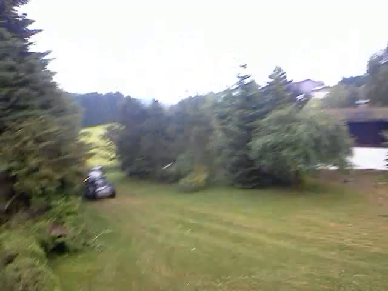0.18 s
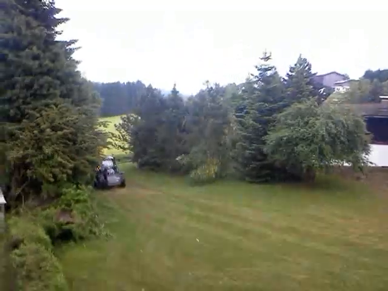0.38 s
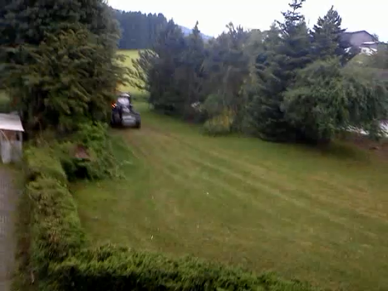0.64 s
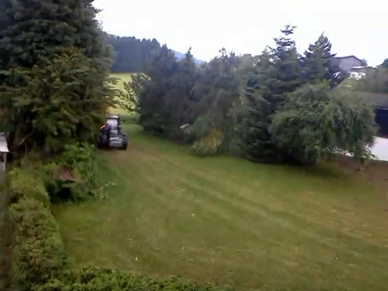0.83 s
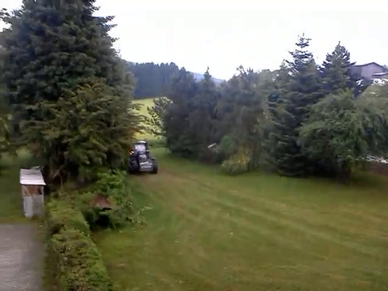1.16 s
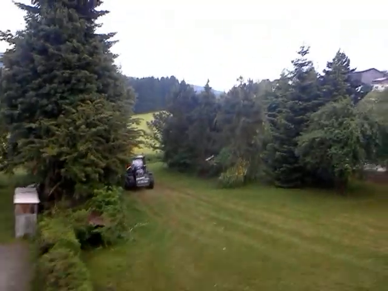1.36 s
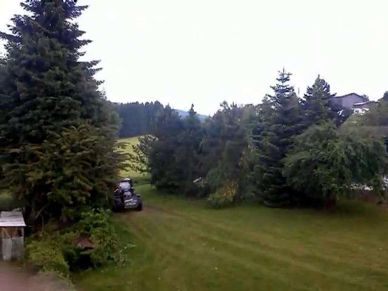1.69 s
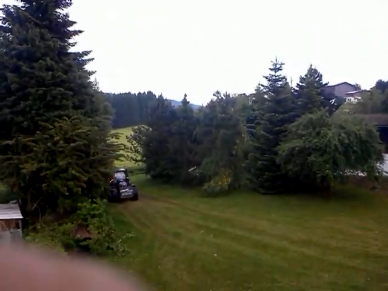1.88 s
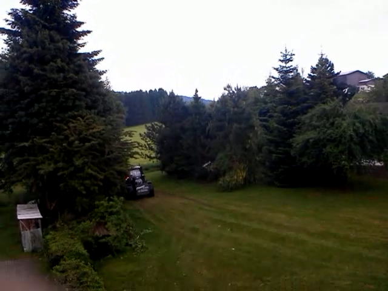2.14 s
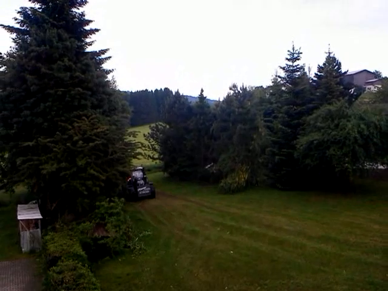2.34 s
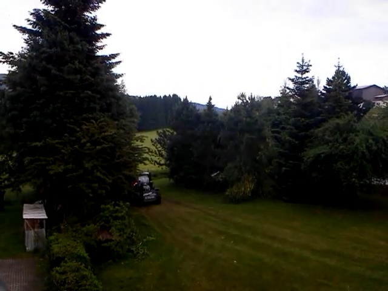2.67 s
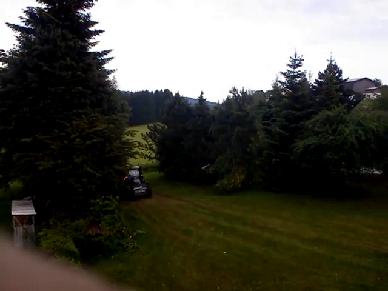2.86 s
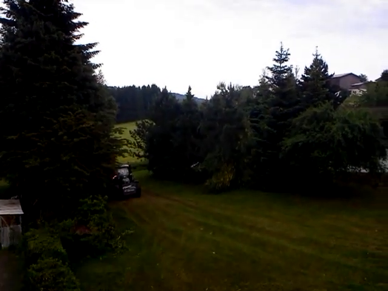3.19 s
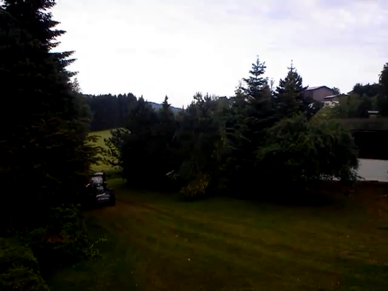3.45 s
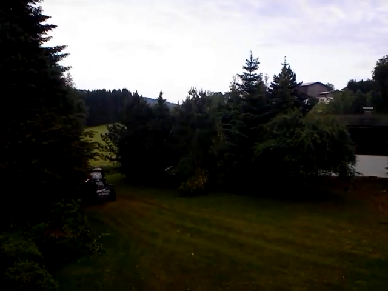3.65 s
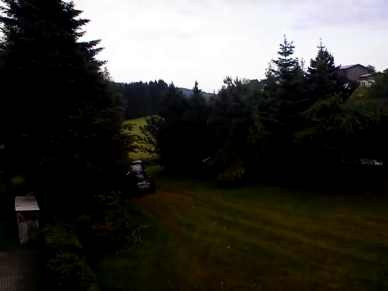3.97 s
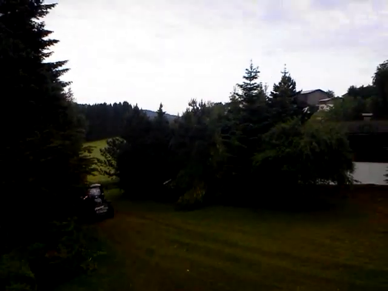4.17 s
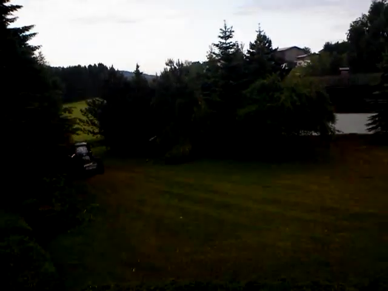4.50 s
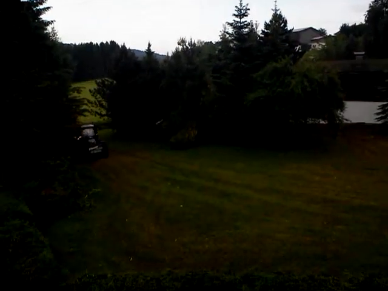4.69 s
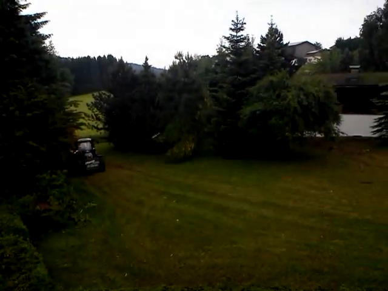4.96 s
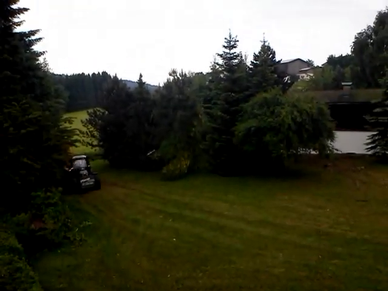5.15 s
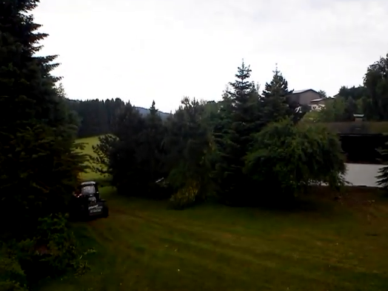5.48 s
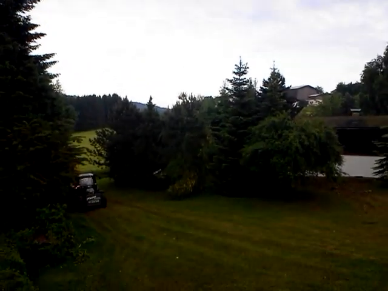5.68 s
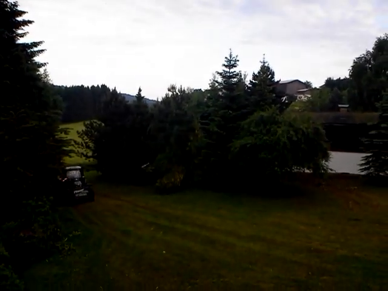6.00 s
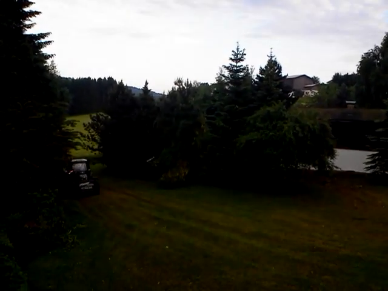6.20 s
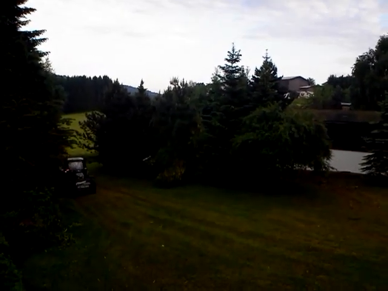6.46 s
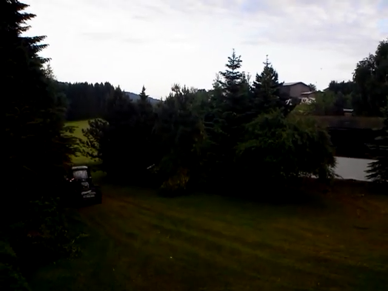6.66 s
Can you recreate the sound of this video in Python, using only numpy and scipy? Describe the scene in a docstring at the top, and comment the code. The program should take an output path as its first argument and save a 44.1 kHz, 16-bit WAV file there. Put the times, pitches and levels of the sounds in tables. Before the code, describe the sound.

A tractor with a flail cutter works a hedge across an open lawn, already running at the start. Its engine roars in the low mids over faint rumble, with a wavering hum around 530 Hz and a softer hydraulic whine near 290 Hz. Flails constantly thrash twigs, with a grainy rattle of chips and flickering hiss. Around 0.4-0.5 s three hard branch cracks strike the steel hood; lighter knocks and snaps follow at 1.4-1.8 s and 2.4-2.5 s, then isolated ones at 3.8, 4.0 and 4.4 s. The engine gradually gets nearer and louder. From 5.5 s the flails bite deepest: cracks, dry snaps and dull thumps crowd together from 5.6 to 6.7 s, while thick wood grinds until about 6.4 s. The drone continues to the end at 6.8 s. Blows have a short outdoor tail; the phone sound is narrow, peaks clipping into ticks.

```python
"""A tractor works along a hedge across a lawn: shaft orders hum, a hydraulic pump whines and the engine roars.
From the start the flails thrash twigs and chips; soon single branches crack against the steel hood.
All the while the engine creeps nearer; late on the flails bite deepest, blows crowd together and thick wood grinds.
Hums are unsteady sines, the rest is coloured noise, ringing bursts and snaps; a narrow-band phone clips the peaks."""
import sys
import numpy as np
from scipy import signal
from scipy.fft import rfft, irfft, next_fast_len
from scipy.io import wavfile
from scipy.ndimage import uniform_filter1d, map_coordinates

SR = 44100
rng = np.random.default_rng(int(sys.argv[2]) if len(sys.argv) > 2 else 0)


def unload_audio(sound):
    """Save the sound as a 16-bit wav file, at the path given as the first command line argument."""
    columns = np.transpose(np.atleast_2d(sound))
    # keep every value between -1 and 1, then stretch to whole-number steps
    steps = np.round(np.clip(columns, -1, 1) * 32767)
    wavfile.write(sys.argv[1], SR, steps.astype(np.int16))


N = 301644

# how deep the flails bite into the hedge: time_s, bite_db
BITE = [(0.0, -39.5), (0.27, -37.5), (0.44, -35.5), (0.59, -29.5), (0.89, -33.5), (2.19, -34), (2.53, -31),
        (2.66, -33), (2.95, -35.5), (3.5, -35), (4.17, -32), (4.84, -34), (5.12, -33), (5.49, -28.5),
        (5.87, -27), (6.25, -28), (6.38, -30.5), (6.69, -31.5), (6.84, -30)]
# colour of the thrashed twigs, shifted in pitch when used: frequency_hz, relative level_db
TWIG_COLOUR = [(300, -45), (700, -3.5), (1000, -3), (1600, -3.5), (1850, -9), (2100, -14), (3000, -51)]
# colour of the thrown chips: frequency_hz, relative level_db
CHIP_COLOUR = [(1200, -41.5), (1900, -10), (2400, -2), (3300, 0.5), (3550, -7.5), (3800, -26.5),
               (4200, -46)]
# colour of the flickering hiss at the top of the narrow band: frequency_hz, relative level_db
TOP_COLOUR = [(3000, -38), (3600, -7), (4000, -11), (4300, -17), (4600, -27.5)]
# branches struck, before distance: start_s, blow_db, knock_hz, crack_hz, crack_over_knock_db, thump_over_knock_db
BRANCHES = [(.435, -11.5, 876, 2290, 2.5, 1), (.482, -11, 1345, 2734, 2.5, -0.5),
            (.516, -5, 1045, 2783, -2.5, -1), (1.359, -11, 982, 3240, -10, -2),
            (1.667, -19.5, 1160, 3050, 3, -5), (1.76, -22.5, 1140, 3260, 7, -6),
            (2.357, -12.5, 1095, 2920, 0, -4), (2.457, -14.5, 1530, 2920, -3, 0),
            (2.519, -13, 1196, 2720, -6, -9), (3.789, -17, 1070, 3220, -1, 0),
            (4.019, -16, 1516, 2800, 4.5, -4), (4.382, -13, 1650, 3240, -11, -1.5),
            (5.62, -13.5, 1745, 2890, -0.5, -18), (5.753, -9, 1374, 3100, -17, -12.5),
            (5.792, -16.5, 1374, 3140, -2.5, -7), (5.856, -16, 1463, 2910, -7, -22.5),
            (5.923, -4.5, 1540, 3126, -2, -0.5), (5.95, -9.5, 1630, 3350, 2, -10),
            (5.981, -9.5, 1030, 3290, -6.5, 1), (6.121, -13.5, 1600, 3450, -6, -7),
            (6.321, -8, 1043, 2840, -3.5, -3), (6.34, -5.5, 1507, 2640, -7.5, 1),
            (6.374, -10.5, 953, 3170, -1, -8), (6.454, -17, 1360, 2360, -21, 0.5),
            (6.595, -14, 1520, 2270, -20, 7.5), (6.62, -14.5, 1400, 2700, -10, 7.5),
            (6.663, -12, 1530, 2810, -9.5, -5), (6.69, -13, 1495, 2610, -2.5, 2.5)]
# how struck wood rings: ratio to its pitch, width as a ratio of the pitch, relative level_db
WOOD_MODES = [(0.799, 0.24, -9), (1, 0.077, 3), (1.203, 0.2, -6), (1.602, 0.39, -14.5)]
# the thump of the steel hood at a blow of -7 dB: frequency_hz, width_hz, relative level_db
HOOD_MODES = [(75, 52, -12.5), (293, 51, 5.5), (496, 94, 1)]
# dry snaps, one short pulse each, before distance: start_s, peak_db, pitch_hz
SNAPS = [(0.524, -2.5, 1200), (1.400, -8.5, 1185), (1.671, -7.5, 2950), (5.7427, -3.5, 1480),
         (5.7928, -9, 2600), (5.841, -9.5, 1363), (5.896, -5.5, 3030), (5.9368, -6, 895), (5.944, -3, 1790),
         (6.019, -6.5, 3460), (6.228, -9, 1690), (6.355, -2.5, 908), (6.586, -10.5, 690)]
# the resonances of grinding thick wood: frequency_hz, width_hz, relative level_db
GRIND_MODES = [(1480, 230, -0.5), (1810, 230, 0)]
# colour of the engine's roar: frequency_hz, relative level_db
ENGINE_COLOUR = [(150, -39), (200, -15), (250, -2), (300, 0.5), (390, -2), (470, 4), (620, -3), (800, -5),
                 (1100, -25), (1800, -33.5), (3000, -56.5)]
# colour of the rumble under it: frequency_hz, relative level_db
RUMBLE_COLOUR = [(15, -41.5), (30, -12), (80, 1), (200, 3.5), (300, -8.5), (600, -48)]
# the shaft: time_s, twelfth_order_hz, twelfth_order_level_db
SHAFT = [(0, 537, -19), (.15, 536, -20.5), (.65, 533, -32), (1.27, 537, -25), (1.6, 536.5, -24.5),
         (1.85, 533.5, -22), (2.5, 525, -25), (2.74, 524.5, -31.5), (3.1, 524.5, -25.5), (3.9, 526.5, -27),
         (4.08, 526, -38), (4.38, 525, -19), (4.7, 525.5, -30), (5.3, 528.5, -23.5), (6.1, 524.5, -33.5),
         (6.4, 523.5, -38), (6.65, 523, -23.5), (6.84, 523, -28.5)]
# two more shaft orders: time_s, thirteenth_order_level_db, seventh_order_level_db
MINOR_ORDERS = [(0, -30.5, -30.5), (.65, -37, -30), (1.27, -29, -35), (1.9, -41, -30), (2.8, -43, -33.5),
                (3.92, -28, -31), (4.2, -36, -39), (4.8, -31.5, -36.5), (5.25, -30.5, -29.5),
                (6.2, -35, -35.5), (6.6, -27, -33.5), (6.84, -35.5, -36)]
# faint orders: multiple of the shaft, level_db
WEAK_ORDERS = [(5, -50), (6, -39), (8, -43.5), (10, -38.5), (24, -44)]
# the hydraulic pump's whine: time_s, pitch_hz, level_db
PUMP = [(0, 293.8, -32.5), (1.1, 293.1, -37), (2.15, 291.8, -29), (2.8, 290.9, -26), (4.6, 290.3, -29),
        (5.2, 292.3, -42.5), (6.2, 289.3, -32), (6.84, 296.4, -28)]
# the whine's octave and the sidebands the shaft puts on it: pump multiple, shaft multiple added, level_db
PUMP_PARTIALS = [(1, -1, -43), (1, 1, -44.5), (1, 2, -42), (2, 0, -43.5)]

BITE_REFERENCE_DB = -30  # the bite at which the flail levels and roar level below hold
TWIG_DB, TWIG_DB_PER_BITE_DB = -24, 0.4
RATTLE_DB, TOP_DB = -30, -42
CENTRE_HZ, CENTRE_HZ_PER_S, CENTRE_HZ_PER_DB = 1182, 30, 5  # the thrash brightens with time and bite
BLOW_T60_S, BLOW_SWELL_S = .11, .005
DEEPENS_DB = 1.1  # harder blows favour the low hood modes: dB per dB of blow and octave under the top mode
GRIND_S, GRIND_RISE_S, GRIND_HOLD_S, GRIND_FALL_S, GRIND_DB = 5.68, .12, .5, .12, -27
ROAR_DB, RUMBLE_DB, NEARING_DB_PER_S = -27, -44, 0.53  # at the start; the tractor creeps closer
ROAR_DB_PER_BITE_DB = 0.13
TAIL_DB, TAIL_T60_S, TAIL_DELAY_S = -7.5, .17, .012
BAND_HZ, CLIP_LEVEL, TOP_HZ = 4700, .705, 15800


def amp(db):
    """Decibels to amplitude."""
    return 10 ** (np.asarray(db) / 20)


def unit(x):
    """Scale to an rms of one."""
    return x / np.sqrt(np.mean(x ** 2) + 1e-20)


def curves(rows):
    """One value per sample for each column after the time."""
    s, *cols = np.transpose(rows)
    return [np.interp(np.arange(N) / SR, s, c) for c in cols]


def wobble(rate):
    """A smooth random curve, rate knots a second."""
    knots = rng.standard_normal(int(N * rate / SR) + 4)
    return map_coordinates(knots, [np.arange(N) * rate / SR])


def filtered(x, response):
    """Shape the spectrum of x by a complex response of frequency."""
    m = next_fast_len(len(x) + 8192)  # padding leaves room for ringing
    return irfft(rfft(x, m) * response(np.fft.rfftfreq(m, 1 / SR)), m)[:len(x)]


def colour(points):
    """The gain through (Hz, dB) points on a log frequency axis."""
    f, db = np.transpose(points)
    return lambda hz: amp(np.interp(np.log(hz + 1), np.log(f), db))


def modes(table):
    """The causal response of a set of resonances, alternating in sign."""
    def response(f):
        return sum((-1) ** k * amp(db) * 1j * f * width / (centre ** 2 - f * f + 1j * f * width)
                   for k, (centre, width, db) in enumerate(table))
    return response


def patchy(patchy_db):
    """White noise with patches of random gain in time and frequency."""
    z = signal.stft(rng.standard_normal(N), nperseg=512)[2]
    field = uniform_filter1d(rng.standard_normal(z.shape), size=5, axis=0)  # smooth over frequency
    field = uniform_filter1d(field, size=8, axis=1)  # smooth over time
    return unit(signal.istft(z * amp(patchy_db * unit(field)), nperseg=512)[1][:N])


def snaps(spread_db):
    """Clicks of very unequal size and random sign, about one sample in sixty."""
    draw = rng.random((3, N))
    struck = draw[0] < 1 / 60
    size = amp(-spread_db * np.log(draw[2] + 1e-3))
    return unit(struck * np.sign(draw[1] - .5) * size)


def tone(turns, db, drift, waver_db):
    """A sine at a phase given in turns, its phase drifting and its rms level wavering about db."""
    phase = turns + rng.random() + drift * wobble(12)
    return np.sqrt(2) * amp(db + waver_db * wobble(16)) * np.sin(2 * np.pi * phase)


def flails(turns, bite_db):
    """Rows of flails pass twice a turn and throw chips; twigs snap in clumps, as patchy noise and clicks."""
    clumps = 0.28 * wobble(9) + wobble(35)
    thrash = patchy(patchy_db=1.7) + 0.29 * snaps(spread_db=4.5)
    dull = unit(filtered(thrash, lambda hz: colour(TWIG_COLOUR)(hz * 1.2)))
    bright = unit(filtered(thrash, lambda hz: colour(TWIG_COLOUR)(hz * .88)))
    centre_hz = CENTRE_HZ + CENTRE_HZ_PER_S * np.arange(N) / SR + CENTRE_HZ_PER_DB * bite_db
    lean = np.clip((centre_hz - 1050) / 420, 0, 1)  # cross-fade from dull to bright
    twigs = unit(dull * (1 - lean) + bright * lean)
    twig_level = amp(TWIG_DB + TWIG_DB_PER_BITE_DB * bite_db + 0.46 * clumps)

    rows = 1 + 0.091 * np.cos(2 * 2 * np.pi * turns)
    chip_noise = patchy(patchy_db=3) + .4 * snaps(spread_db=3.5)
    chips = unit(filtered(rows * chip_noise, colour(CHIP_COLOUR)))
    rattle = amp(RATTLE_DB + 0.35 * clumps + 0.25 * wobble(14)) * chips
    return twig_level * twigs + amp(bite_db) * rattle


def wood(pitch_hz):
    """Struck wood rings in modes at fixed ratios to its pitch."""
    return modes([(pitch_hz * ratio, pitch_hz * width, db) for ratio, width, db in WOOD_MODES])


def hood(blow_db):
    """The steel hood thumps in low modes, and deeper under a harder blow."""
    top_hz = HOOD_MODES[-1][0]
    return modes([(hz, width, db + DEEPENS_DB * (blow_db + 7) * np.log2(top_hz / hz))
                  for hz, width, db in HOOD_MODES])


def dry_snap(pitch_hz, t):
    """A sine pulse with a quick rise, gone in a few cycles, scaled to a peak of one."""
    cycles = pitch_hz * t
    pulse = (1 - np.exp(-cycles / 0.058)) * np.sin(2 * np.pi * cycles)
    pulse = pulse * amp(-60 * cycles / (3 + pitch_hz / 450))
    return pulse / np.abs(pulse).max()


def branches():
    """Each branch splinters as a swelling burst of noise: a thump of the hood, a knock and a crack; snaps join."""
    out, t = np.zeros(N + SR), np.arange(SR // 4) / SR
    shape = amp(-60 * t / BLOW_T60_S) * (1 - np.exp(-t / BLOW_SWELL_S)) ** 1.3
    for s, blow_db, knock_hz, crack_hz, crack_db, thump_db in BRANCHES:
        bodies = hood(blow_db), wood(knock_hz), wood(crack_hz)
        bursts = shape * np.sign(rng.standard_normal((3, len(t))))
        parts = np.array([filtered(burst, body) for burst, body in zip(bursts, bodies)])
        parts = parts / np.abs(parts).max(axis=1, keepdims=True)
        levels = amp(blow_db - 4.5 + np.array([thump_db, 0, crack_db]))  # room for the parts to add up
        out[round(s * SR):][:len(t)] += levels @ parts
    for s, peak_db, pitch_hz in SNAPS:
        out[round(s * SR):][:len(t)] -= amp(peak_db) * dry_snap(pitch_hz, t)
    return filtered(out[:N], colour([(20, -25.5), (60, -1), (3500, 0.5), (4100, -12)]))  # distance dulls the blows


def grind():
    """Thick wood grinds: dense splintering rings in two resonances; it rises, holds and falls."""
    corners_s = np.cumsum([GRIND_S, GRIND_RISE_S, GRIND_HOLD_S, GRIND_FALL_S])
    swell, = curves(list(zip(corners_s, [0, 1, 1, 0])))
    splinters = patchy(patchy_db=1.5) + .4 * snaps(spread_db=4.5)
    return amp(GRIND_DB + .8 * wobble(25)) * swell * unit(filtered(splinters, modes(GRIND_MODES)))


def engine(bite_db):
    """Exhaust and fan roar, harder with the bite, over a weak rumble; both grow as the tractor nears."""
    near_db = NEARING_DB_PER_S * np.arange(N) / SR
    roar = unit(filtered(patchy(patchy_db=1.5), colour(ENGINE_COLOUR)))
    roar = roar * amp(ROAR_DB + ROAR_DB_PER_BITE_DB * bite_db + 0.49 * wobble(14))
    rumble = amp(RUMBLE_DB) * unit(filtered(patchy(patchy_db=0.25), colour(RUMBLE_COLOUR)))
    return amp(near_db) * (roar + rumble)


def shaft_hum(turns):
    """The turning shaft hums at whole multiples of its speed, the twelfth drifting and wavering least."""
    thirteenth_db, seventh_db = curves(MINOR_ORDERS)
    out = tone(12 * turns, curves(SHAFT)[1], drift=.02, waver_db=.8)
    out += tone(13 * turns, thirteenth_db, drift=.05, waver_db=2)
    out += tone(7 * turns, seventh_db, drift=.07, waver_db=3)
    for order, db in WEAK_ORDERS:
        out += tone(round(order) * turns, db, drift=.072, waver_db=2)
    return out


def pump_whine(turns):
    """The hydraulic pump whines at its own pitch, with an octave and the sidebands that the shaft puts on it."""
    pump_hz, pump_db = curves(PUMP)
    pump = np.cumsum(pump_hz) / SR  # phase in cycles
    out = tone(pump, pump_db, drift=.06, waver_db=2.5)
    for pump_multiple, shaft_multiple, db in PUMP_PARTIALS:
        phase = round(pump_multiple) * pump + round(shaft_multiple) * turns
        out += tone(phase, db, drift=.064, waver_db=3.5)
    return out


def top_flicker(bite_db):
    """A fast-flickering hiss at the top of the narrow band, its level following the bite."""
    flicker = amp(3.1 * wobble(150)) * rng.standard_normal(N)
    hiss = unit(filtered(flicker, colour(TOP_COLOUR)))
    return amp(bite_db + TOP_DB + 1.2 * wobble(30)) * hiss


def garden(x):
    """Trees and walls scatter a short tail: a decaying noise after a brief delay."""
    t = np.arange(SR // 3) / SR
    tail = rng.standard_normal(len(t)) * amp(-60 * t / TAIL_T60_S) * (t > TAIL_DELAY_S)
    return signal.fftconvolve(x, tail / np.linalg.norm(tail))[:N]


def scene():
    """One shaft drives hum and flails; one bite curve drives flails, roar and hiss; only the blows get a tail."""
    turns = np.cumsum(curves(SHAFT)[0] / 12) / SR  # of the shaft
    bite_db = curves(BITE)[0] - BITE_REFERENCE_DB
    hits = branches()
    cutting = flails(turns, bite_db) + hits + grind()
    machine = engine(bite_db) + shaft_hum(turns) + pump_whine(turns)
    return (cutting + machine + top_flicker(bite_db) + amp(TAIL_DB) * garden(hits))[None]


def record(dry):
    """A narrow voice band; the highest peaks then clip flat, which leaves short ticks above it."""
    band = colour([(3500, 0), (4300, -10), (BAND_HZ, -32), (BAND_HZ + 100, -120)])
    clipped = np.clip(filtered(dry[0], band), -CLIP_LEVEL, CLIP_LEVEL)
    return filtered(clipped, lambda hz: hz < TOP_HZ)[None]


dry = scene()
out = record(dry)
unload_audio(out)
```